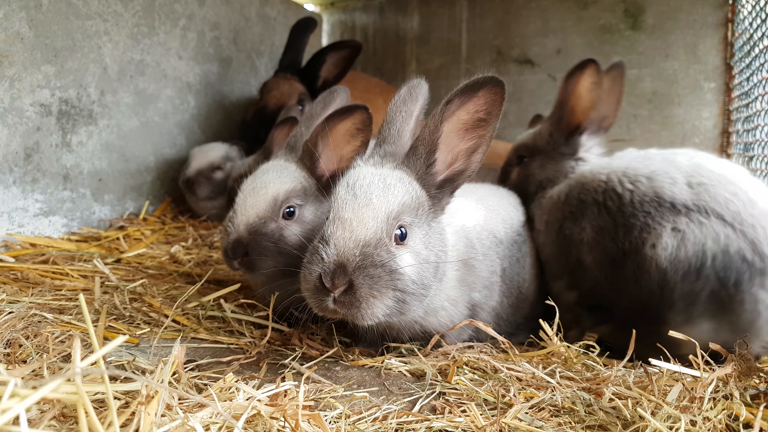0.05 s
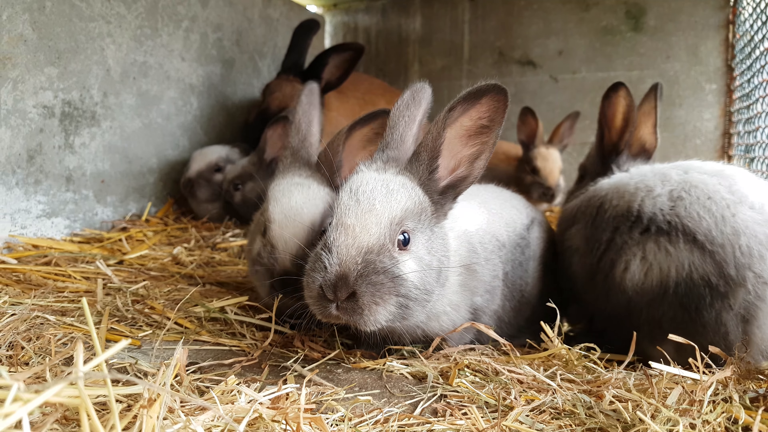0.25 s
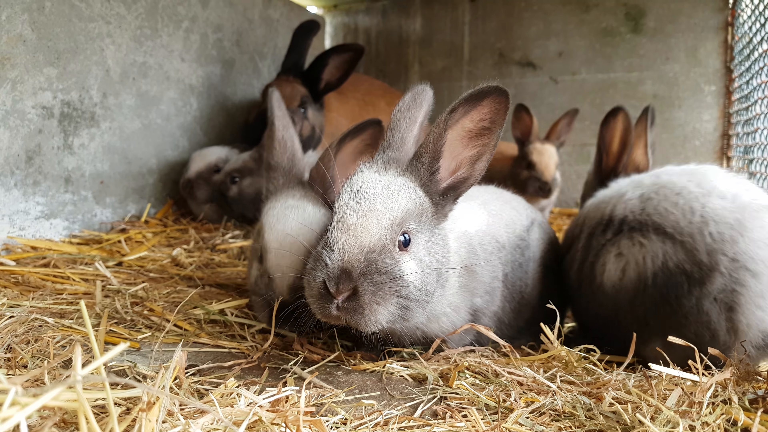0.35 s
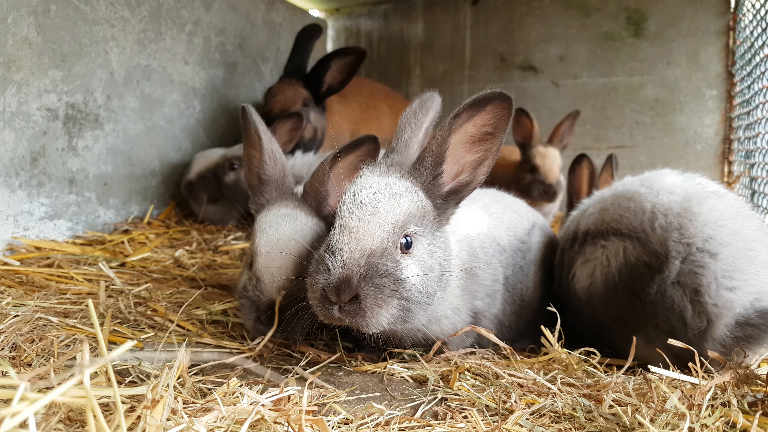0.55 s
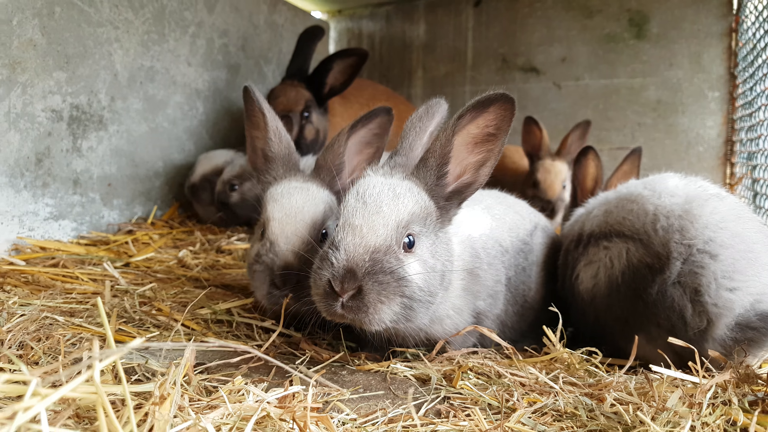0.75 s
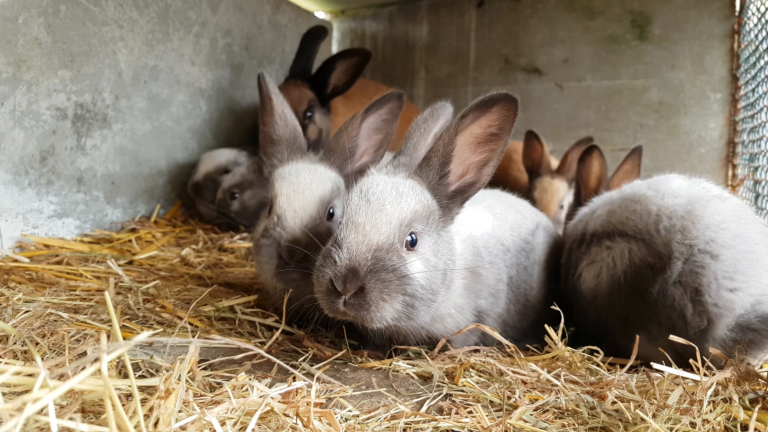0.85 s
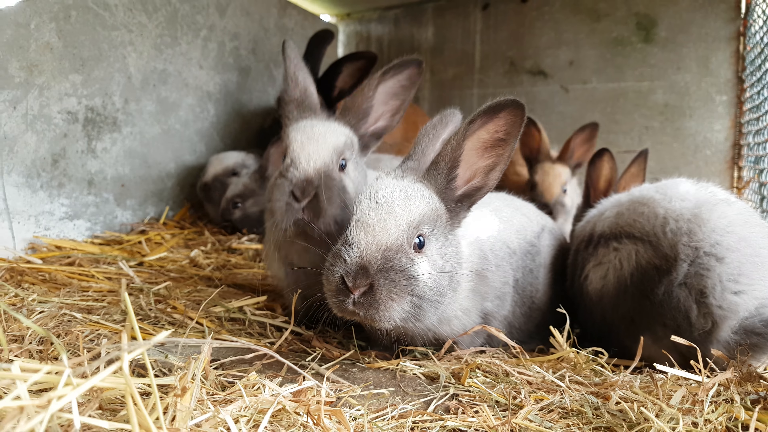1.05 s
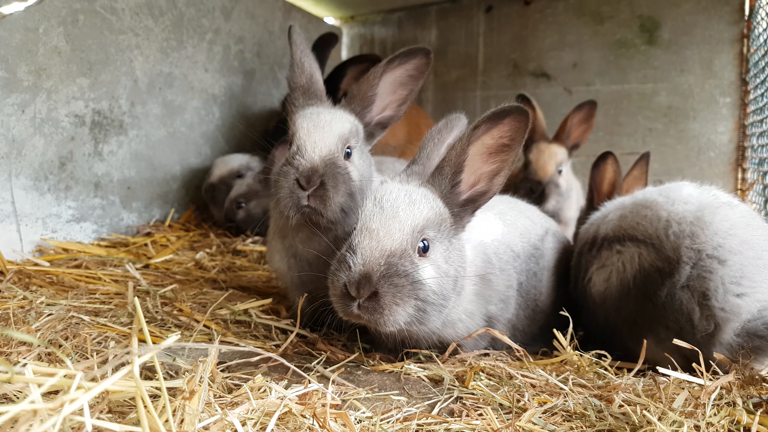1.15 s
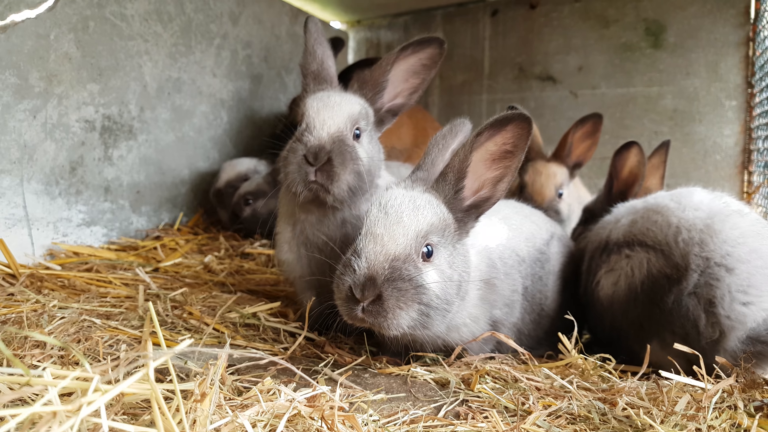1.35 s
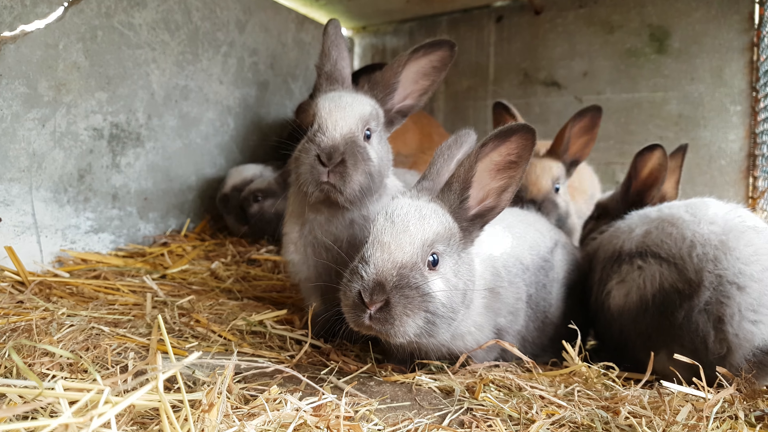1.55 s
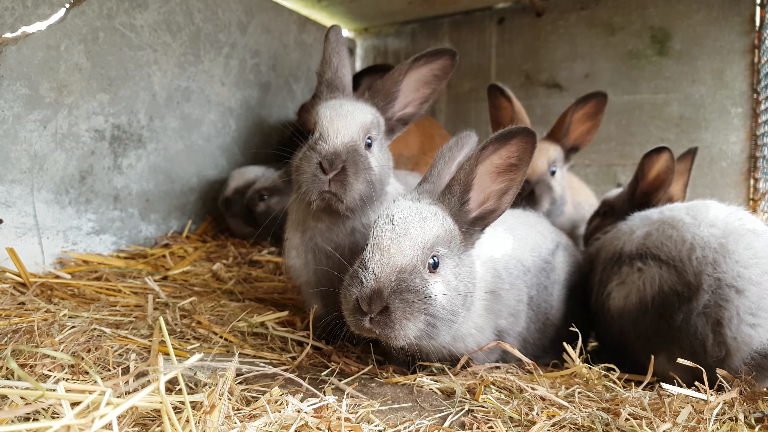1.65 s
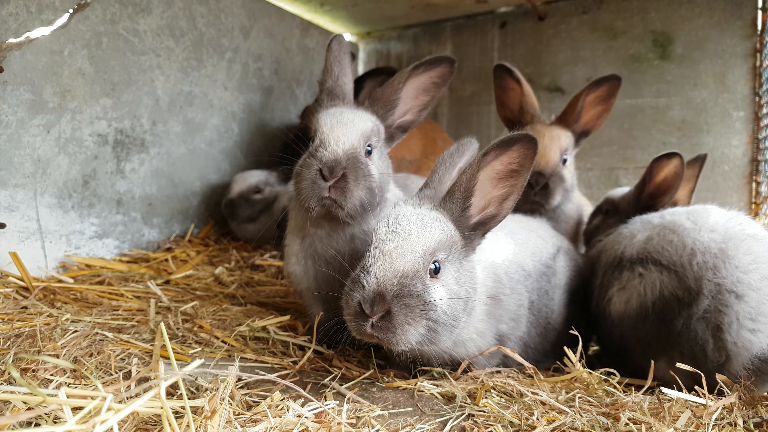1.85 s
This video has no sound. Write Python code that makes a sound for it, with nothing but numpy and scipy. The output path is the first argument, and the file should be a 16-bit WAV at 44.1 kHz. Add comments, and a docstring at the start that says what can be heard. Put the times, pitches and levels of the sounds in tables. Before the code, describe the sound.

Young rabbits shuffling in a straw hutch, with close dull bumps, rubbing and faint distant birds.

```python
"""Young rabbits shuffle on straw in a hutch, very close. Far birds whistle over a quiet outdoor hush
and the straw stirs faintly. Then stick-slip rubbing, scuffs and dull bumps, from the animals or a
hand on the housing, come through solid contact, mostly on the right, with small snags on top.
They peak just after half a second and thin out. Two straw swishes stand out, near 1.1 s and 1.7 s,
and at the end a wire pings once."""
import sys
import numpy as np
from scipy import signal
from scipy.fft import rfft, irfft
from scipy.io import wavfile
from scipy.ndimage import uniform_filter1d

SR = 44100
rng = np.random.default_rng(int(sys.argv[2]) if len(sys.argv) > 2 else 0)


def materialize(psi):
    """Save the field psi as 16-bit PCM at rate SR to the path in sys.argv[1].

    A 1-D psi becomes a single channel; in a 2-D psi each row is a channel.
    """
    bounded = np.clip(np.atleast_2d(psi).T, -1, 1)
    quanta = np.round(bounded * 32767).astype(np.int16)
    wavfile.write(sys.argv[1], SR, quanta)


N = 83790

# tone of the air bed: f/Hz, gain/dB
HUSH_EQ = [(20, 3.5), (75, 10.5), (140, 6), (220, -6), (300, 7.5), (360, 2), (450, 4.5), (600, -4),
           (1200, -8), (2500, -7), (3700, -10), (5200, -17), (7800, -18), (9500, -24), (12500, -17.5),
           (16000, -17.5)]
# fader ride of the air bed: t/s, level/dB
HUSH_FADER = [(0, -61.5), (.6, -61), (1.1, -59.5), (1.5, -61.5), (1.9, -61)]
# stereo lean of the air bed: f/Hz, left minus right/dB
HUSH_PAN = [(100, 8.5), (600, -5), (2500, -5), (4000, -5), (8000, -1), (14000, 0)]
# far bird notes: t/s, length/s, start f/Hz, end f/Hz, level/dB, wobble/Hz, reverb send/dB
BIRD_NOTES = [(0, 0.027, 5300, 5050, -67, 140, -1), (.035, 0.038, 3910, 4120, -64, 120, 0.5),
              (0.088, 0.02, 3640, 3650, -62.5, 44, 1), (0.134, 0.15, 3865, 3926, -72.5, 15, -5),
              (0.288, 0.041, 3500, 3970, -64, 180, -2), (0.336, 0.058, 2397, 2230, -64, 60, -3),
              (0.659, 0.067, 3420, 3240, -70, 100, -3), (0.881, 0.052, 4160, 3600, -66, 240, 5),
              (0.924, 0.038, 3400, 3000, -63, 150, 3), (.955, .035, 2880, 2685, -58, 104, -4),
              (1.092, .16, 5410, 5120, -70, 124, -1), (1.20, 0.058, 4680, 4580, -72, 140, -2),
              (1.361, .02, 3560, 3570, -56.5, 94, -7), (1.403, 0.036, 3740, 3100, -64, 150, -4),
              (1.484, 0.055, 3644, 3810, -63, 80, -2), (1.58, 0.22, 3710, 3850, -74.5, 170, 2),
              (1.687, 0.12, 2720, 2425, -61, 36, -3), (1.803, 0.093, 2397, 2126, -61.5, 45, -2)]
# straw swishes: t/s, length/s, level/dB, left minus right/dB
STRAW_SWISHES = [(0.012, 0.033, -73, 3), (0.102, 0.021, -62.5, -1), (.222, .008, -75, 3),
                 (.503, .012, -61, -1), (0.848, .04, -62, 0), (0.913, 0.016, -62, -5),
                 (1.108, 0.037, -49, -3.5), (1.155, 0.047, -71, -2), (1.544, 0.045, -61.5, -3),
                 (1.697, 0.025, -52, -1)]
# tone of sliding stalks: f/Hz, gain/dB
STRAW_EQ = [(500, -20), (1300, 3), (2200, -2), (4000, 1), (5500, -3), (8000, 0), (9500, -7), (12000, -3),
            (15500, 0)]
# strength of the rubbing: t/s, left level/dB, right level/dB
RUB_FADER = [(0, -81.5, -80), (.13, -66, -76), (.195, -51.5, -53), (.25, -45.5, -40.5), (.35, -44, -40.5),
             (.45, -38, -35.5), (.54, -30, -32), (0.619, -37.5, -37.5), (.70, -53, -36),
             (.82, -43.5, -44.5), (0.916, -59, -49.5), (0.951, -37, -37), (1.01, -46, -39),
             (1.061, -55, -43), (1.16, -57, -56.5), (1.225, -56, -57.5), (1.28, -45, -45.5),
             (1.37, -56, -41), (1.52, -50.5, -45), (1.60, -46.5, -40), (1.67, -47.5, -42),
             (1.701, -61, -53.5), (1.841, -79, -44), (1.9, -55, -58)]
# tone of the rubbing: f/Hz, gain/dB
RUB_EQ = [(20, -12.5), (45, -4.5), (90, 7), (160, -2), (380, -7), (520, -18), (800, -33), (1200, -48.5),
          (2500, -66), (6000, -90)]
# dull scuffs: t/s, length/s, level before EQ/dB, f/Hz, left minus right/dB
SCUFF_CUES = [(0.143, 0.016, -57, 500, 3), (.15, 0.028, -47, 323, -1), (0.24, 0.019, -46.5, 526, -13),
              (0.269, 0.023, -46.5, 490, -4), (0.339, 0.019, -45.5, 634, -23), (0.378, 0.016, -52, 557, -9),
              (0.529, 0.047, -33.5, 432, 0), (0.599, 0.015, -42, 565, -1.5), (0.643, 0.028, -39, 483, -8),
              (0.741, 0.0082, -47, 450, -8), (0.778, 0.0087, -51, 564, -16), (0.862, 0.009, -47, 594, -22),
              (0.943, .02, -43.5, 485, -26), (1.077, 0.017, -52.5, 655, -17), (1.276, 0.017, -57, 510, -10),
              (1.335, 0.012, -53, 570, -14), (1.535, .008, -48, 477, -12), (1.575, 0.024, -52.5, 510, -16),
              (1.849, 0.028, -55.5, 580, -19)]
# dull bumps: t/s, level before trim and EQ/dB, left minus right/dB, f/Hz
BUMP_CUES = [(0.251, -29, 5, 160), (.282, -42, 1.5, 405), (.309, -34.5, 10, 200), (.341, -22, -33, 250),
             (.401, -26, 3, 170), (0.422, -25.5, -8, 185), (0.437, -23.5, -4, 217), (0.488, -25.5, -5, 256),
             (0.507, -22, -10, 200), (.516, -18.5, 5, 367), (.524, -20.5, -26, 250), (.533, -22, -10, 252),
             (.543, -24, -6, 274), (.554, -17.5, -1, 307), (.560, -17, 11, 310), (.570, -23, -13, 307),
             (0.588, -20.5, -6, 332), (0.602, -26.5, -6, 200), (.622, -24.5, -11, 257),
             (.652, -18.5, -3.5, 223), (.659, -20.5, -25, 288), (.687, -29, -3, 178), (.699, -27, -20, 168),
             (.746, -25.5, -7, 270), (0.771, -33, 9, 157), (.796, -33, -15, 203), (.866, -28, -16, 274),
             (.902, -25.5, -20, 242), (.940, -29, 1, 177), (0.949, -23, -16, 210), (0.987, -27.5, 6, 142),
             (1.017, -21.5, 0.5, 216), (1.026, -20, -10, 121), (1.078, -34.5, -9, 194),
             (1.199, -35.5, 6, 166.4), (1.253, -36, 1.5, 167), (1.285, -29, -2.5, 153),
             (1.316, -34.5, -7, 183), (1.361, -34, -6, 273), (1.393, -35, -22, 193), (1.417, -34, -17, 166),
             (1.44, -29.5, -27, 216), (1.45, -32, -3, 125), (1.491, -30.5, -11, 229),
             (1.535, -39.5, -5, 242), (1.589, -27, -3.5, 146), (1.644, -37, -14, 145),
             (1.673, -42.5, 2, 196), (1.821, -33.5, -32, 221)]
# sharp snags: t/s, level before trim and EQ/dB, f/Hz, half-width of the scrape/s
SNAG_CUES = [(.344, -41, 910, 0.011), (.425, -38, 930, 0.017), (.447, -35.5, 990, 0.01),
             (.489, -35.5, 930, 0.0039), (.496, -35.5, 1080, 0.0025), (.506, -40, 1050, 0.0091),
             (.522, -30, 1270, 0.0089), (.536, -28.5, 1610, 0.0075), (.548, -39.5, 1400, .008),
             (.559, -30.5, 1310, 0.0082), (.590, -26.5, 1420, 0.0022), (.6285, -29, 1630, 0.0015),
             (.653, -35, 1120, 0.0067), (.662, -34, 1020, 0.021), (.678, -37, 1200, 0.009),
             (.687, -26.5, 1620, 0.011), (.700, -38, 1700, 0.0043), (.706, -25.5, 1720, 0.0043),
             (.713, -37, 1510, 0.0052), (.743, -40.5, 1020, 0.0028), (.805, -35, 1090, 0.0045),
             (.812, -31.5, 1260, 0.0044), (.866, -45, 850, 0.0045), (.902, -38, 960, .004),
             (1.016, -36.5, 1010, 0.0056), (1.0305, -25, 1550, 0.0029), (1.0333, -34.5, 1410, .002),
             (1.366, -41.5, 726, 0.0086), (1.393, -40.5, 800, 0.0033), (1.438, -37, 940, 0.0071),
             (1.491, -50, 730, 0.0034), (1.640, -39.5, 820, 0.01), (1.821, -40, 930, 0.0044)]
# tone of the scratch on the wire: f/Hz, gain/dB
SCRATCH_EQ = [(700, -20), (1300, -2), (3500, 4), (5000, -8), (8000, -12.5), (11000, -28)]
# ringing modes of the wire: f/Hz, level/dB, t60/s
WIRE_MODES = [(1386, -52.5, .35), (1580, -60, 0.32), (1863, -53, .12), (2320, -56, .13),
              (3250, -52.5, 0.084), (4860, -59, 0.087), (5750, -62, .06), (6449, -62, .09),
              (8000, -69, .06)]

SLIPS_PER_S, SLIP_SPREAD_DB = 300, 3.5
KNEE_HZ, FIRM_DB, BRIGHTEN_DB_PER_DB = 236, -51.5, 0.39
BUMP_TRIM_DB, BODY_SEND_DB = -0.5, -12.5
SNAG_TRIM_DB, SNAG_LEFT_DB, SCRAPE_DB, TICK_GAP_S = 1, -36, -1, 0.001
PING_AT_S, PING_RISE_S, RATTLE_RAD = 1.802, 0.0014, 0.39
SCRATCH_DB, SCRATCH_T60_S = -55, 0.1
CUTOFF_HZ = 15900
TIME = np.arange(N) / SR


def amp(db):
    """Decibels to gain."""
    return 10 ** (np.asarray(db) / 20)


def unit(x):
    """Scales to rms 1."""
    return x / np.sqrt(np.mean(x ** 2) + 1e-20)


def pan(db):
    """Constant-power gains, the left db above the right."""
    gains = amp([[db / 2], [-db / 2]])
    return gains / np.linalg.norm(gains)


def eq(x, points, depth=1):
    """Filters by a curve of f/Hz, gain/dB; depth scales its decibels."""
    hz, db = np.transpose(points)
    curve_db = np.interp(np.log(np.fft.rfftfreq(N, 1 / SR) + 1), np.log(hz), db)
    return irfft(rfft(x) * amp(depth * curve_db), N)


def pulse(t, hz, cycles, phase=0):
    """A short swing under a bell curve centred on t = 0."""
    return np.exp(-.5 * (t * hz / cycles) ** 2) * np.cos(2 * np.pi * hz * t + phase)


def reverb(x, t60):
    """A diffuse tail, different on each side."""
    t = TIME[:SR // 2]
    tail = rng.standard_normal((2, len(t))) * amp(-60 * t / t60)
    tail /= np.linalg.norm(tail, axis=1, keepdims=True)
    return signal.fftconvolve(np.atleast_2d(x), tail, axes=1)[:, :N]


def hush():
    """A quiet bed of outdoor air and hiss."""
    air = unit(eq(rng.standard_normal((2, N)), HUSH_EQ))
    fader = amp(np.interp(TIME, *np.transpose(HUSH_FADER)))
    return fader * eq(air, HUSH_PAN, depth=np.array([[.5], [-.5]]))


def birds():
    """Gliding, wavering whistles, blurred by distance."""
    direct, send = np.zeros((2, N))
    for start, length, from_hz, to_hz, db, wobble_hz, send_db in BIRD_NOTES:
        progress = np.clip((TIME - start) / length, 0, 1)
        wobble = unit(uniform_filter1d(rng.standard_normal(N), size=90))
        hz = from_hz + (to_hz - from_hz) * progress + wobble_hz * wobble
        swell = np.sqrt(abs(np.sin(np.pi * progress)))
        note = amp(db) * swell * np.sin(2 * np.pi * np.cumsum(hz) / SR)
        direct += note
        send += amp(send_db) * note
    return pan(db=-7) * (direct + reverb(send, t60=0.29))


def straw():
    """Stalks slide over each other in brief swishes of fine grains."""
    grains = rng.standard_normal((2, N)) * (rng.random((2, N)) < 9000 / SR)  # 9000 a second
    fader = np.zeros((2, N))
    for start, length, db, side_db in STRAW_SWISHES:
        progress = np.clip((TIME - start) / length, 0, 1)
        fader += amp(db) * pan(side_db) * abs(np.sin(np.pi * progress ** 0.52))
    swishes = fader * unit(eq(grains, STRAW_EQ))
    return swishes + amp(-17) * reverb(swishes, t60=0.14)


def rubbing():
    """Dense little slips, each a dull pulse; firmer contact opens up the tone."""
    times, left, right = np.transpose(RUB_FADER)
    level_db = np.array([np.interp(TIME, times, left), np.interp(TIME, times, right)])
    slips = (rng.random((2, N)) < SLIPS_PER_S / SR) * rng.choice([-1, 1], (2, N))
    strength = amp(SLIP_SPREAD_DB * np.clip(rng.standard_normal((2, N)), -2, 1.5))
    rub = unit(eq(slips * strength, RUB_EQ))
    lows = signal.sosfiltfilt(signal.butter(2, KNEE_HZ, fs=SR, output="sos"), rub)
    brightness = amp(BRIGHTEN_DB_PER_DB * (level_db - FIRM_DB))
    return amp(level_db) * (lows + brightness * (rub - lows))


def scuffs():
    """Runs of fast slips briefly give the rubbing a hollow, grunting pitch."""
    out, t = np.zeros((2, N)), np.arange(-400, 401) / SR
    for start, length, db, hz, side_db in SCUFF_CUES:
        progress = np.clip((TIME - start) / length, 0, 1)
        swell = abs(np.sin(np.pi * progress ** 0.45))
        slip = pulse(t, hz, cycles=0.62)
        grunt = swell * signal.oaconvolve(rng.standard_normal((2, N)), slip[None], "same", axes=1)
        grunt *= np.linalg.norm(swell) / np.linalg.norm(grunt, axis=1, keepdims=True)
        out += amp(db) * pan(side_db) * grunt
    return eq(out, [(100, -10), (300, 4.5), (800, 2), (1500, -26), (3000, -40.5)])


def bumps():
    """Soft knocks shake the two sides out of step and die quickly in the body they pass through."""
    knocks = np.zeros((2, N))
    signs = rng.choice([-1, 1], (len(BUMP_CUES), 2))
    for (at, db, side_db, hz), (lead, polarity) in zip(BUMP_CUES, signs):
        phase = np.array([[lead * np.pi / 2], [0]])  # left a quarter cycle early or late
        knock = polarity * pulse(TIME - at, hz, cycles=0.4, phase=phase)
        knocks += amp(db + BUMP_TRIM_DB) * pan(side_db) * knock
    knocks = eq(knocks, [(20, -18), (70, -0.5), (600, 2.5), (1000, -9)])
    return knocks + amp(BODY_SEND_DB) * reverb(knocks, t60=0.081)


def snags():
    """Each snag is one sharp slip inside a short scrape of smaller ones, hard right."""
    out, t = np.zeros(N), np.arange(-200, 201) / SR
    for at, db, hz, width in SNAG_CUES:
        away = abs(TIME - at)
        grains = rng.standard_normal(N) * (rng.random(N) < 1500 / SR)
        # scrape grains fade out around the main tick, keeping it clear and steady
        duck = np.minimum(away / TICK_GAP_S, 1) ** 2
        scrape = grains * np.exp(-.5 * (away / width) ** 2) * duck
        slips = amp(SCRAPE_DB) * scrape / (np.linalg.norm(scrape) + 1e-9)
        slips[round(at * SR)] += 1  # the main tick
        tick = pulse(t, hz, cycles=0.34, phase=np.pi / 2)
        out += amp(db + SNAG_TRIM_DB) * np.convolve(slips, tick, "same")
    out = eq(out, [(200, 28), (700, 6.5), (2200, -5), (3000, -6.5), (4500, -26)])
    return out * amp([[SNAG_LEFT_DB], [0]])


def wire():
    """A light scratch rings the wire mesh, which rattles a little."""
    t = np.maximum(TIME - PING_AT_S, 0)
    scratch = unit(eq(rng.standard_normal((2, N)), SCRATCH_EQ))
    ping = amp(SCRATCH_DB - 60 * t / SCRATCH_T60_S) * scratch
    for hz, db, t60 in WIRE_MODES:
        phase = rng.uniform(0, 2 * np.pi, (2, 1))
        rattle = RATTLE_RAD * unit(uniform_filter1d(rng.standard_normal((2, N)), size=150))
        ping += amp(db - 60 * t / t60) * np.sin(2 * np.pi * hz * t + phase + rattle)
    attack = np.minimum(t / PING_RISE_S, 1)
    return ping * attack * pan(db=-6)


def scene():
    """Close contact sounds, straw and wire over the outdoor backdrop."""
    contact = bumps() + rubbing() + scuffs() + snags()
    return contact + straw() + wire() + birds() + hush()


def record(dry):
    """A steep high cut takes the very top off the mix."""
    high_cut = signal.firwin(511, CUTOFF_HZ, window=("kaiser", 8), fs=SR)
    return signal.oaconvolve(dry, high_cut[None], "same")


dry = scene()
out = record(dry)
materialize(out)
```